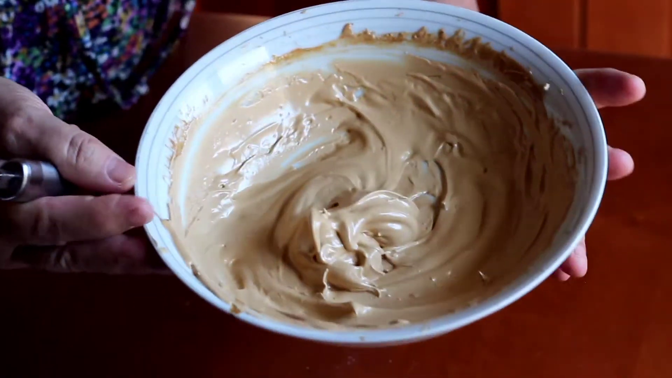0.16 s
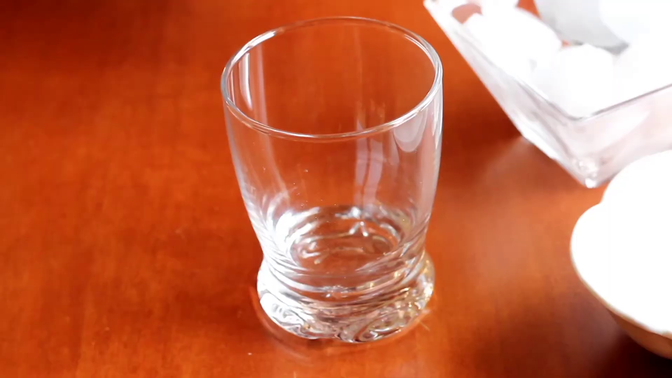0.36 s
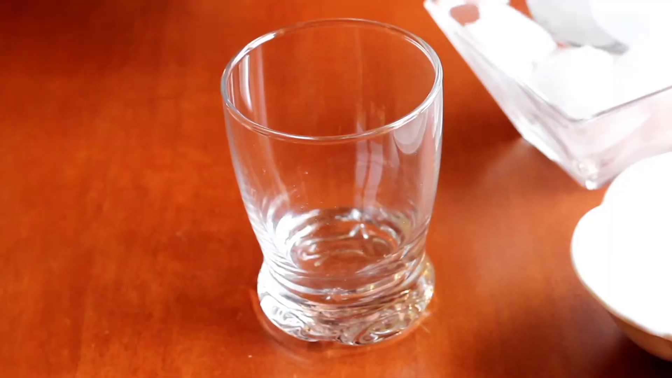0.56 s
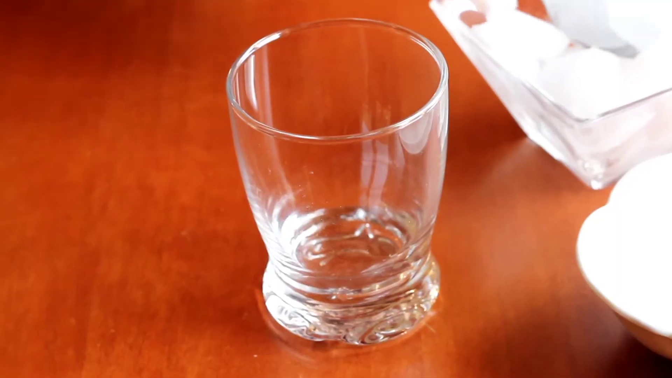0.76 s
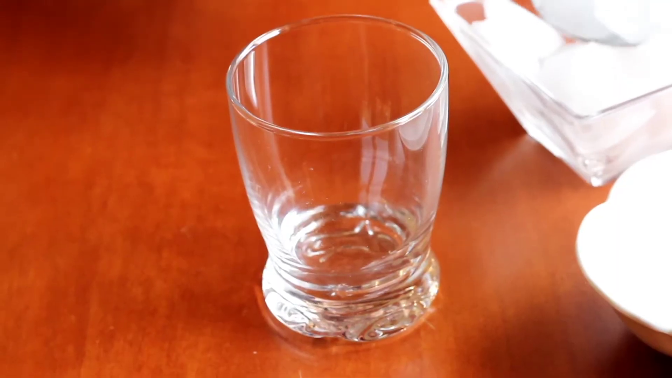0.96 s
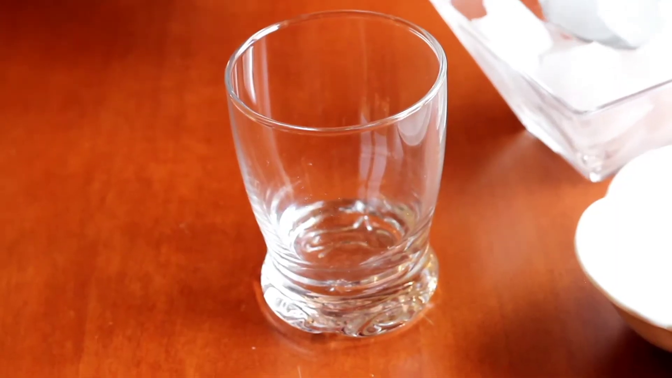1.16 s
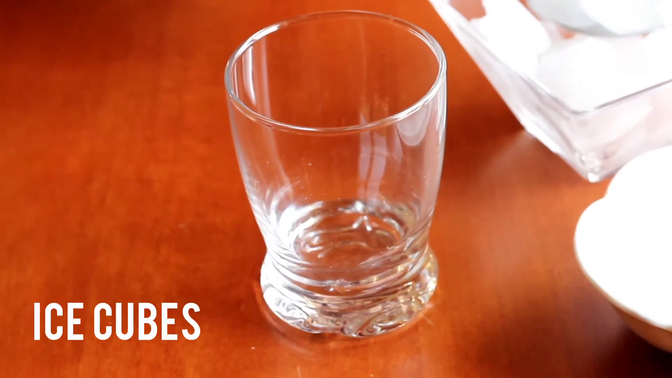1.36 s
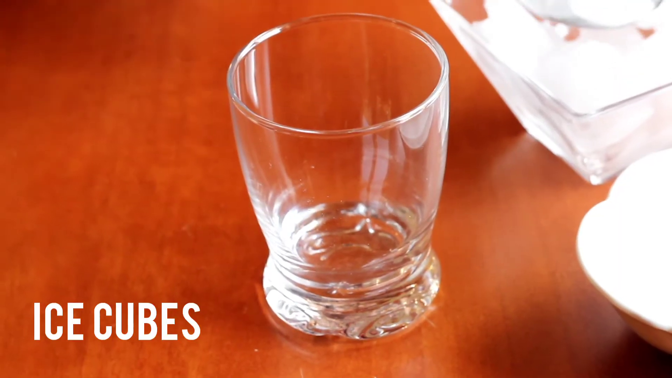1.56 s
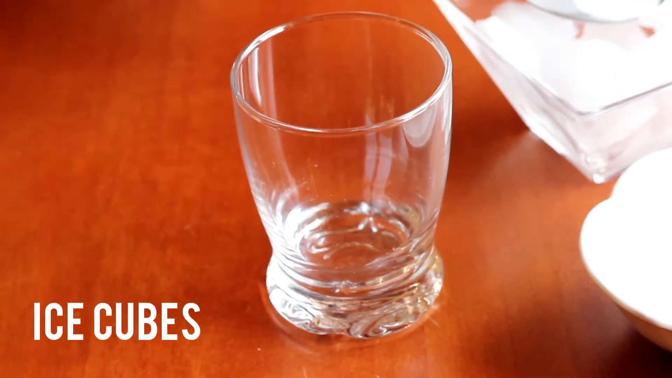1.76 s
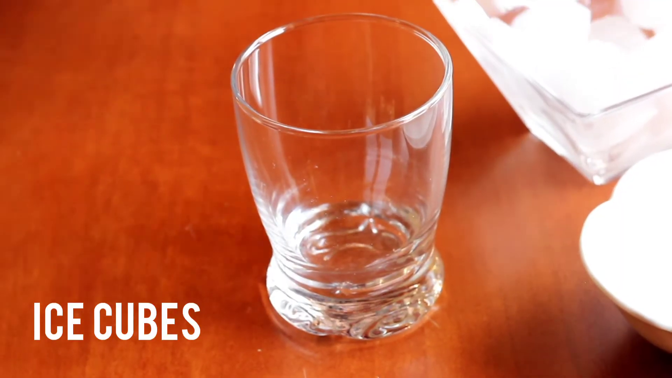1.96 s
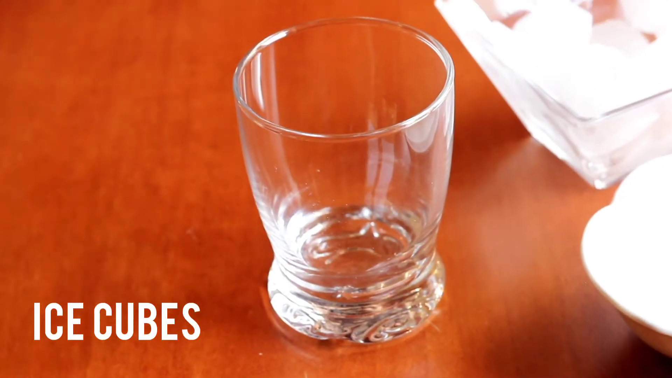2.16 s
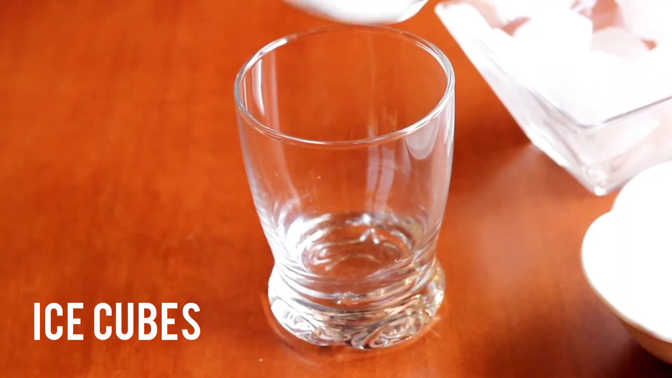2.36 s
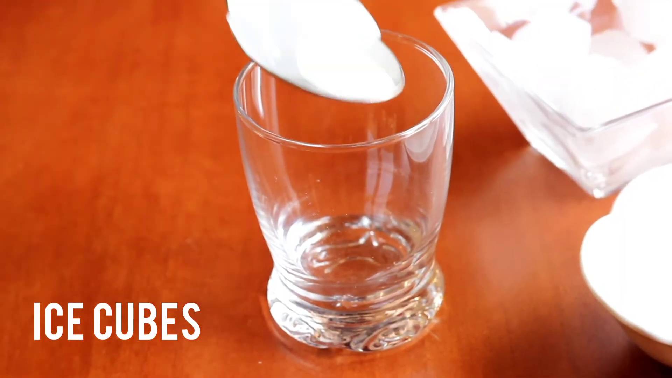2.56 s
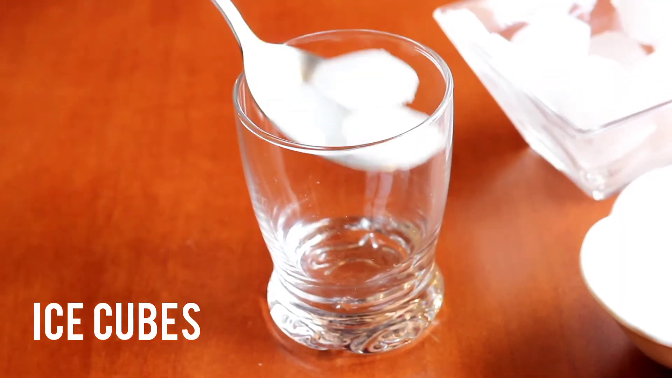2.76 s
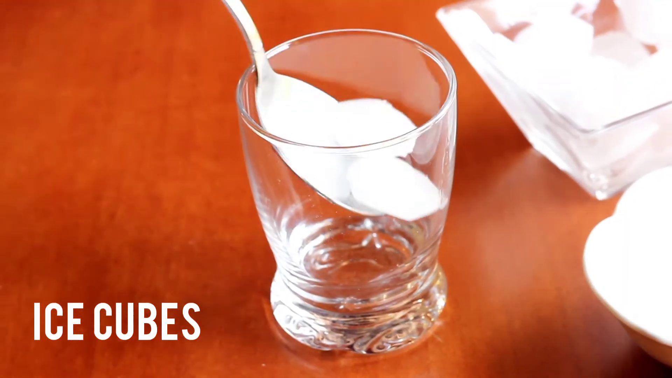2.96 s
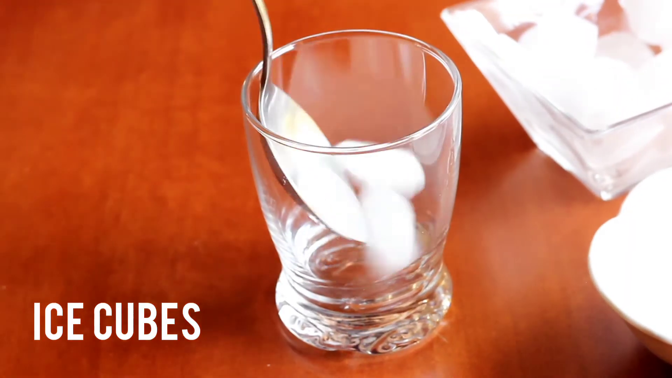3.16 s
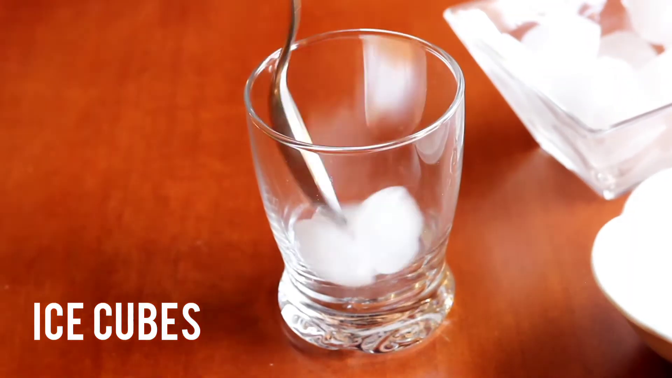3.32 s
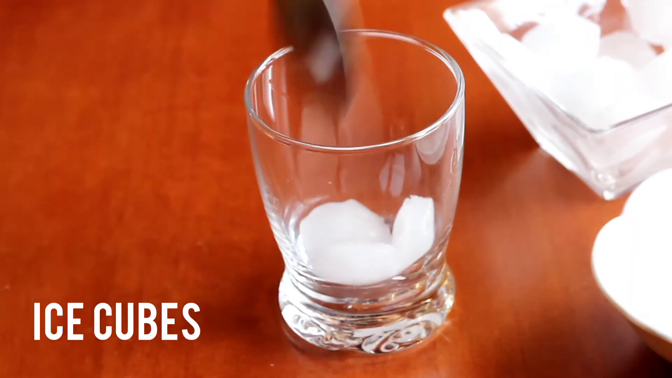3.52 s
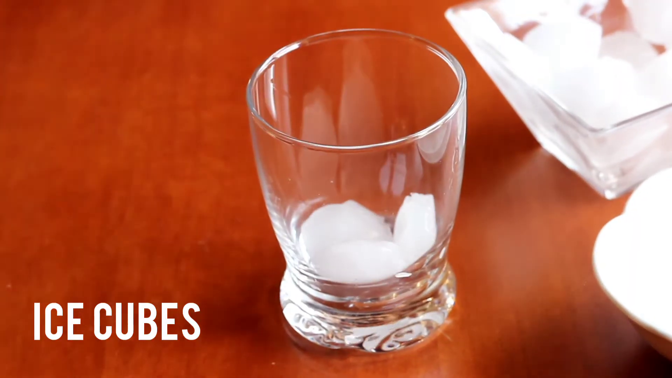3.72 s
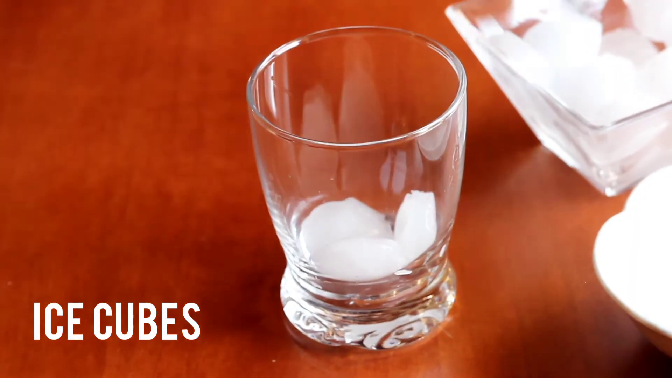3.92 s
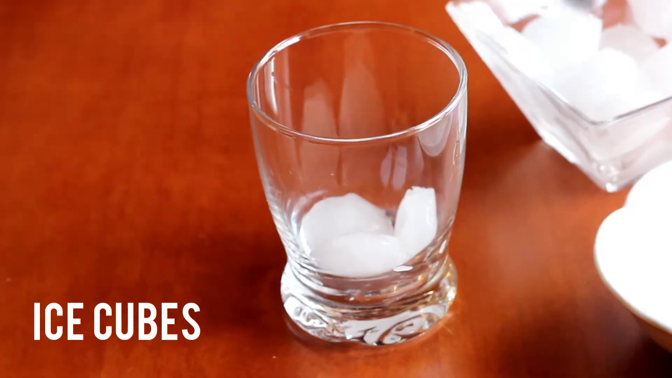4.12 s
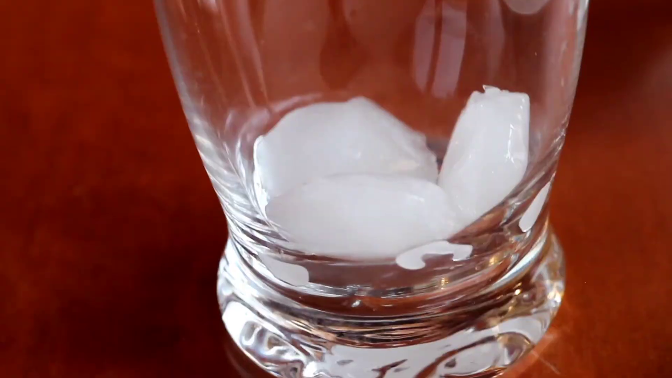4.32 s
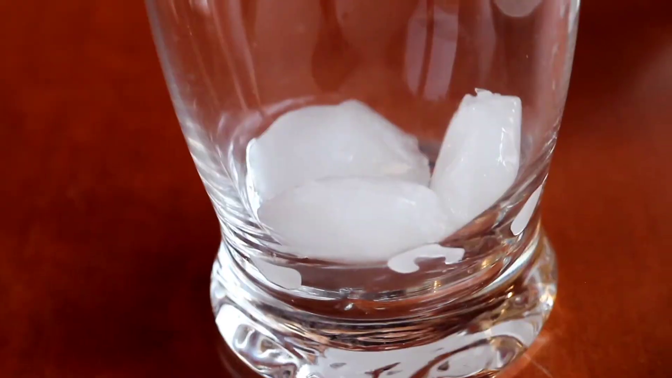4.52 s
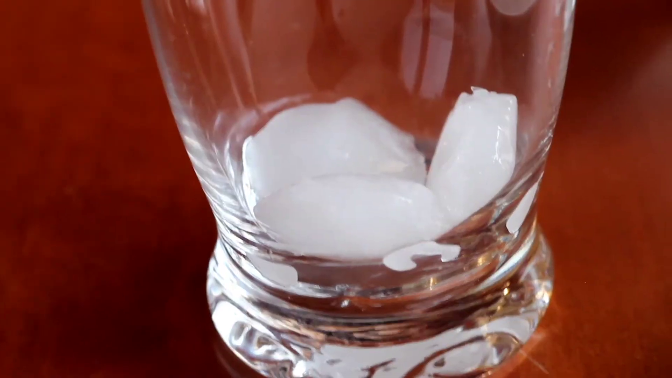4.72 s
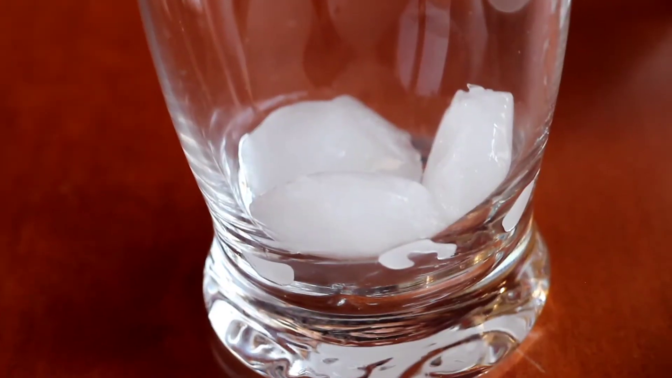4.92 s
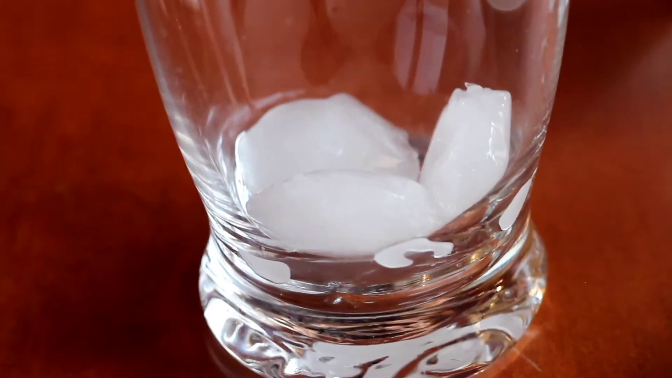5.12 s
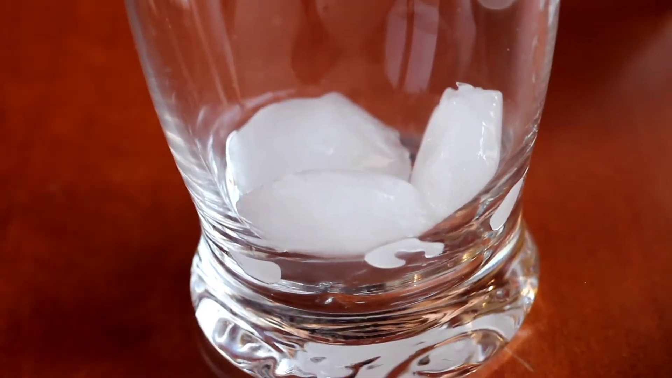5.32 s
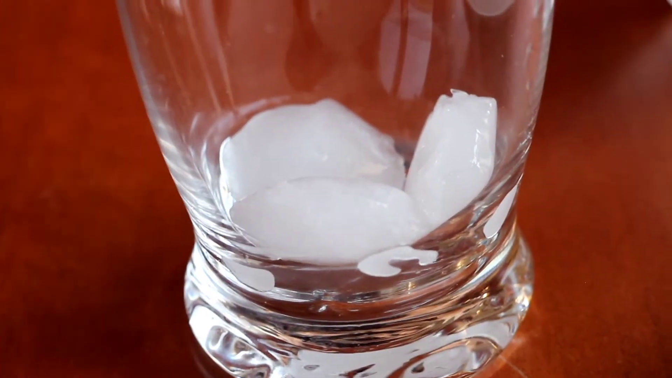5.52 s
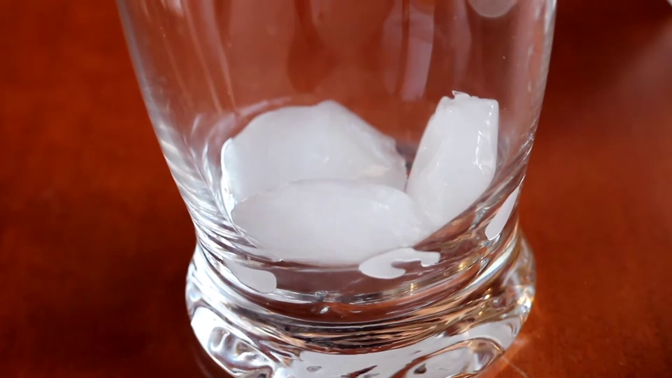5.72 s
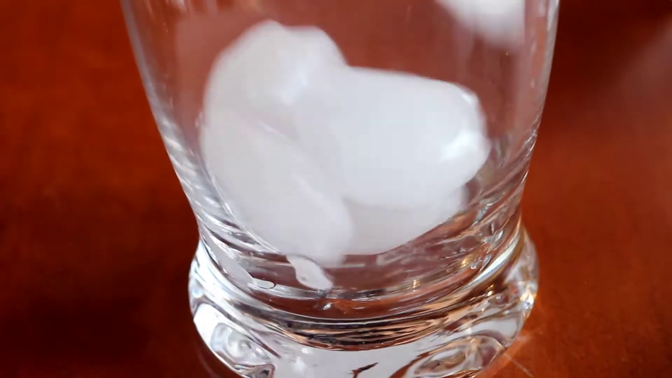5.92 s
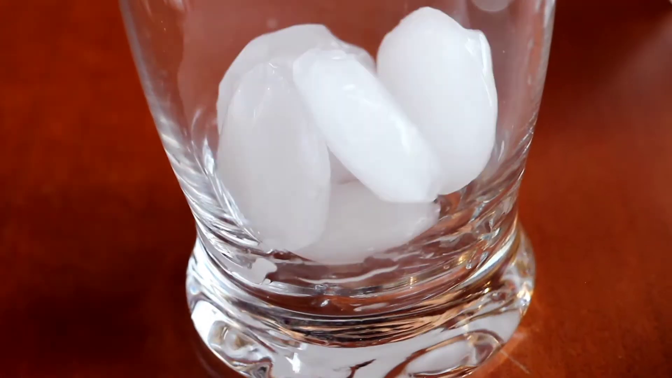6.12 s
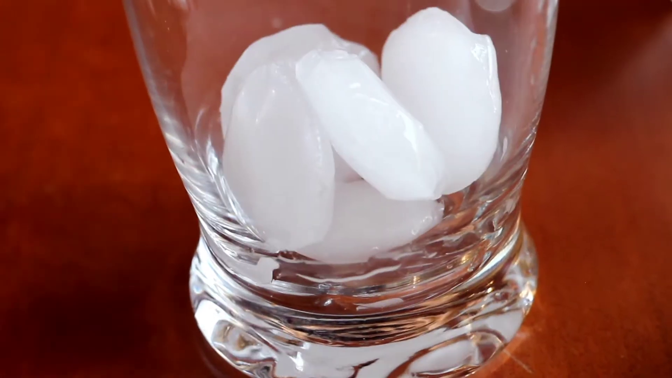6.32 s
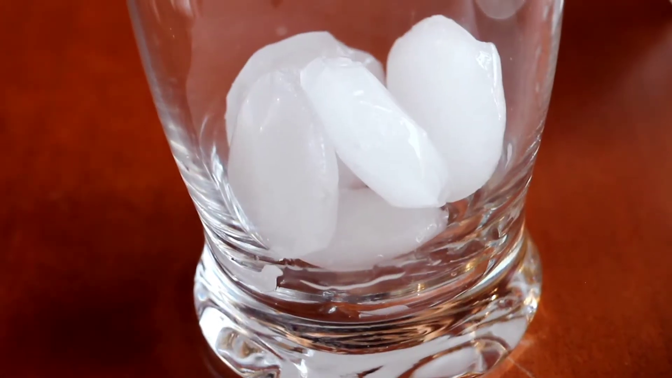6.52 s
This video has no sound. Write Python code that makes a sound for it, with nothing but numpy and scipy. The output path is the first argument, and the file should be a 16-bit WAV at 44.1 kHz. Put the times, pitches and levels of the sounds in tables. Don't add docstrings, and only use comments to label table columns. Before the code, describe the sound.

Irregular knocks of ice in a dish come first, dry and sharp with dull table thuds. A steel spoon ticks against a glass rim, then wet cubes slide off and clatter into the tumbler, ringing high and clear. One stray knock follows in the lull. A second, stronger cascade of ice hits glass and ice, then settles quickly. The close microphone catches short room echoes, soft hiss and a low hum from the jolted wooden table.

```python
import sys
import numpy as np
from scipy import signal
from scipy.fft import rfft, irfft
from scipy.io import wavfile
from scipy.ndimage import uniform_filter1d

SR = 44100
rng = np.random.default_rng(int(sys.argv[2]) if len(sys.argv) > 2 else 0)


def transcribe(u):
    v = np.clip(np.atleast_2d(u).T, -1, 1)
    q = np.round(v * 32767).astype(np.int16)
    wavfile.write(sys.argv[1], SR, q)


def linear_from_db(decibels):
    return 10 ** (np.asarray(decibels, float) / 20)


N = 290178


def at_hz(points, hz, column=1):
    points = np.array(points)
    return np.interp(np.log(hz), np.log(points[:, 0]), points[:, column])


def coloured(x, spectrum, low_hz, high_hz):
    hz = np.arange(N // 2 + 1) * SR / N + 1
    shaped = rfft(x) * linear_from_db(at_hz(spectrum, hz))
    in_band = shaped[(hz > low_hz) & (hz < high_hz)]
    return irfft(shaped, N) * N / np.sqrt(2 * np.sum(abs(in_band) ** 2))


def band_pass(x, band_hz):
    return signal.sosfilt(signal.butter(2, band_hz, "band", fs=SR, output="sos"), x)


def high_pass(x, order, floor_hz):
    return signal.sosfilt(signal.butter(order, floor_hz, "high", fs=SR, output="sos"), x)


def ring(clicks, hz, t60):
    r, w = linear_from_db(-60 / (t60 * SR)), 2 * np.pi * hz / SR
    return signal.lfilter([0, np.sin(w)], [1, -2 * r * np.cos(w), r * r], clicks + 1e-18)


# (f/Hz, level/dB per Hz)
HISS_SPECTRUM = [(20, -3), (55, -7), (150, -3), (400, -3), (800, -2.5), (2000, -8.5), (5000, -12.5),
                 (10000, -17.5), (14000, -16), (15900, -17.5), (16300, -53), (22000, -60)]


def mic_hiss():
    noise = rng.standard_normal(N)
    return linear_from_db(-64) * coloured(noise, HISS_SPECTRUM, low_hz=400, high_hz=16000)


# (f/Hz, width/Hz, level/dB)
TABLE_MODES = [
    [(56, 28, -7.5), (102, 7, -12.5), (144.8, 11, -2), (186, 20, -2)],
    [(260.9, 9, 1.5), (213, 16, -52)],
    [(377, 24, -1.5), (343, 21, -5), (594, 15, -7)],
]
# (rest level/dB, jolt level/dB, weight of the place, t60/s)
SHAKE = [
    (-67, -2.5, 0.4834, 3.56),
    (-75, -6, 0.96, 2.33),
    (-71, -9.5, -2.5, 1.9),
]
# (t/s, level/dB, place as level/dB gained by the low group, lost by the upper)
JOLTS = [(0.53, -75, -1), (1.48, -51.5, -2.5), (1.67, -64.5, 18.5), (2.4, -72, 3), (3.37, -58.5, -7),
         (3.54, -53.5, -3), (3.72, -72.5, 16.5), (4.25, -54.5, 0.5), (4.47, -61, -0.5), (5.0, -62.5, -3),
         (5.94, -59, 2), (6.05, -57, -4.5), (6.21, -62, 12), (6.55, -69, 13)]
JOLT_RISE_S = 0.11


def table_hum():
    out, t = np.zeros(N), np.arange(0, N, 50) / SR
    for group, (rest_db, jolt_db, weight, t60) in zip(TABLE_MODES, SHAKE):
        power = linear_from_db(rest_db) ** 2
        for s, db, place in JOLTS:
            rise = np.clip(1 + (t - s) / JOLT_RISE_S, 0, 1)
            fall_db = 60 * np.maximum(t - s, 0) / t60
            power = power + (rise * linear_from_db(db + jolt_db + weight * place - fall_db)) ** 2
        shake = np.interp(np.arange(N) / SR, t, np.sqrt(power))
        for hz, width, db in group:
            hum = ring(rng.standard_normal(N), hz, np.log(1000) / np.pi / width)
            out += linear_from_db(db - 3.5) * shake * hum / hum.std()
    return out


# (f/Hz, t60/s, level/dB)
KITCHEN_TAIL = [(151, 0.72, -21), (420, 0.61, -1), (930, 0.44, 0), (2500, 0.56, -2), (5000, 0.44, -2.5),
                (10030, 0.41, 2), (16100, 0.31, -27)]
# (t/s, level/dB)
ECHOES = [
    (.0015, -6),
    (.0078, -10.5),
    (0.0206, -20.5),
    (.027, -17.5),
]


def kitchen(x):
    t, answer = np.arange(SR) / SR, np.zeros(SR)
    edges = 70 * 2 ** np.arange(0, 8.1, 0.5)
    for low, high in zip(edges, edges[1:]):
        hz = np.sqrt(low * high)
        decay_db = at_hz(KITCHEN_TAIL, hz, column=2) - 60 * t / at_hz(KITCHEN_TAIL, hz)
        answer += band_pass(rng.standard_normal(SR), [low, high]) * linear_from_db(decay_db)
    answer *= linear_from_db(-29) * np.clip((t - 0.004) / 0.0024, 0, 1)
    for s, db in ECHOES:
        answer[round(s * SR)] += linear_from_db(db)
    return signal.fftconvolve(x, answer)[:N]


# (t/s, level/dB)
SLIDES = [
    [(0.38, -73), (0.57, -76), (0.718, -68), (0.97, -77.5), (1.072, -80), (1.668, -72), (1.752, -64.5),
     (1.914, -73.5), (2.05, -94)],
    [(3.1, -70), (3.222, -74), (3.336, -62), (3.364, -59), (3.522, -65.5), (3.62, -81)],
    [(5.68, -76), (5.788, -62), (5.908, -67), (5.982, -60), (6.13, -56.5), (6.186, -85), (6.3, -77)],
]
# (f/Hz, level/dB per Hz)
SLIDE_COLOUR = [(120, -28), (200, 8), (259, -10), (292, -18), (346, -5), (540, -5.5), (4220, -20),
                (12000, -46), (15600, -75), (22000, -120)]
GRAINS_PER_S, GRAIN_SPREAD_DB = 1200, 5


def level(rows):
    s, db = np.transpose(rows)
    return linear_from_db(np.interp(np.arange(N) / SR, s, db, left=-200, right=-200))


def ice_slides():
    struck = rng.random(N) < GRAINS_PER_S / SR
    strength = linear_from_db(GRAIN_SPREAD_DB * np.minimum(rng.exponential(1, N), 4))
    grains = struck * strength * rng.choice([-1, 1], N)
    fader = sum(level(rows) for rows in SLIDES)
    return linear_from_db(-6) * fader * coloured(grains, SLIDE_COLOUR, low_hz=1300, high_hz=2000)


CONTACT_S, FILM_S = 0.0002, 0.0009


def knocks(rows, hollow, floor_hz, click_db, second_db, click_t60, tick_db, tick_hz, thud_db):
    out, push, t = np.zeros(N + 2000), np.zeros(N), np.arange(2000) / SR
    noise = rng.standard_normal((len(rows), len(t)))
    ticks = band_pass(noise * np.exp(-t / 0.00066), tick_hz)
    for (s, peak_db, hz, second_hz, sharp_db, low_db), tick in zip(rows, ticks):
        cube = np.sin(2 * np.pi * hz * t) - linear_from_db(second_db) * np.sin(2 * np.pi * second_hz * t)
        cube *= linear_from_db(peak_db + click_db - 60 * t / click_t60) * (1 - np.exp(-t / CONTACT_S))
        at, sign = round((s + FILM_S) * SR), np.sign(tick[3])
        out[at:at + len(t)] += sign * cube + linear_from_db(sharp_db + tick_db) * tick / abs(tick).max()
        push[at] = sign * linear_from_db(low_db + thud_db)
    thud = sum(linear_from_db(db) * ring(push, hz, t60) for hz, db, t60 in hollow)
    return out[:N], high_pass(thud, 3, floor_hz)


ICE_REACH_DB, ICE_SCATTER_DB = 13.5, 4.5


def ice_ring(rows, modes, gain_db):
    s, db, click_hz = np.transpose([row[:3] for row in rows])
    at = ((s + FILM_S) * SR).astype(int)
    chance, out = rng.standard_normal((len(rows), len(modes), 2)), np.zeros(N)
    for k, (hz, own_db, t60) in enumerate(modes):
        reach_db = -ICE_REACH_DB * abs(np.log2(hz / click_hz))
        hit_db = db + own_db + gain_db + reach_db + ICE_SCATTER_DB * chance[:, k, 0]
        clicks = np.zeros(N)
        clicks[at] = np.sign(chance[:, k, 1]) * linear_from_db(hit_db)
        out += ring(clicks, hz, t60)
    return signal.lfilter([0.3], [1, -0.7], out)


DAMPING_DB_PER_S = 800


def struck_modes(blows, modes, gain_db, wobble_db, kick):
    t, blows = np.arange(N) / SR, np.array(blows)
    last = np.searchsorted(blows[:, 0], t, side="right") - 1
    since, phase = abs(t - blows[last, 0]), 2 * np.pi * rng.random((len(modes), 2))
    out, knots = np.zeros(N), np.arange(0, N / SR + 0.1, 0.009)
    for k, (hz, partner_hz, partner_db, t60, share_db) in enumerate(modes):
        db = np.where(last >= 0, blows[last, k + 1] - 60 * since / t60, -200)
        db = np.maximum.accumulate(db + DAMPING_DB_PER_S * t) - DAMPING_DB_PER_S * t
        db += wobble_db * np.interp(t, knots, rng.standard_normal(len(knots)))
        kicks = np.cumsum(kick * rng.standard_normal(len(blows)))
        turn = uniform_filter1d(kicks[last], size=60)
        main = np.sin(2 * np.pi * hz * t + phase[k, 0] + turn)
        partner = np.sin(2 * np.pi * partner_hz * t + phase[k, 1] - turn)
        out += uniform_filter1d(linear_from_db(db), size=24) * linear_from_db(share_db) * (main + linear_from_db(partner_db) * partner)
    return linear_from_db(gain_db) * out


def placed_blows(blows, shape, scatter_db):
    s, db, place = np.transpose(blows)[:, :, None]
    own_db, weight = np.transpose(shape)
    chance_db = scatter_db * rng.standard_normal((len(blows), len(shape)))
    return np.hstack([s, db + own_db + weight * place + chance_db])


# (t/s, click peak level/dB, click f/Hz, thud level/dB)
DISH_KNOCKS = [(0.399, -37, 3930, -83), (0.4464, -42, 3700, -60), (0.513, -38.5, 2560, -81),
               (0.5671, -32.5, 2900, -69), (0.5749, -46, 2500, -47.5), (0.593, -28.5, 2350, -42.5),
               (0.639, -63, 2520, -51), (0.792, -44, 2440, -50.5), (0.8825, -44.5, 2550, -51),
               (0.9857, -23.5, 2760, -39), (0.9974, -54, 2870, -39.5), (1.0143, -27.5, 3860, -53),
               (1.0329, -29, 1810, -62), (1.262, -37, 2440, -58), (1.2779, -23.5, 3980, -40),
               (1.298, -39, 3930, -58), (1.4163, -27.5, 4020, -77), (1.4419, -33, 2650, -46),
               (1.4593, -29, 3700, -39), (1.4788, -28, 2950, -48), (1.513, -26.5, 3140, -40),
               (1.5342, -20.5, 4300, -38), (1.556, -32, 2540, -42.5), (1.5976, -45, 3180, -50),
               (1.752, -42, 3480, -48), (1.774, -39.5, 2580, -57), (1.7888, -34.5, 2580, -45),
               (1.816, -43, 3300, -64), (1.8253, -37.5, 1580, -51), (3.9605, -30.5, 2150, -43)]
# (f/Hz, level/dB, t60/s)
DISH_THUD = [(147, -30, 0.15), (418, -7, 0.041), (600, 1, 0.0065), (930, 3, 0.0071), (1574, 5.5, 0.0054)]
# (f/Hz, level/dB, t60/s)
DISH_ICE = [(1560, -4.5, 0.063), (1774, -4, 0.051), (2584, -2, 0.024), (2764, -4, 0.016), (3224, -5, 0.016),
            (3700, -0.5, 0.024), (4000, -3, 0.019), (5940, 0, .025)]
# (t/s, ring level/dB, place as level/dB gained by the lowest pair)
TAPS = [(0.5657, -57.5, 16), (0.9837, -56, 6), (1.2758, -44, 1), (1.416, -57, 4), (1.531, -48.5, 15)]
# (f/Hz, partner f/Hz, partner level/dB, t60/s, share radiated level/dB)
DISH_MODES = [(2710, 2530, 1, .03, -9), (3960, 4050, -5, .14, 0), (4900, 5200, -6, .12, -1),
              (5865, 6130, -1, .015, -6), (8700, 7900, -3, .03, -2)]
# (level/dB, weight of the place)
TAP_SHAPE = [(0, 1), (3, -.7), (-1, -.4), (-9, .3), (-5, 0)]
TOUCH_S = 0.004
DISH_TICK_DB, STEEL_TICK_DB = -29.5, 6.5


def dish_digging():
    rows = []
    for s, db, hz, low_db in DISH_KNOCKS:
        steel = any(abs(s - tap[0]) < TOUCH_S for tap in TAPS)
        tick_db = db + DISH_TICK_DB + STEEL_TICK_DB * steel
        rows.append((s, db, hz, 3410 + 0.63 * hz, tick_db, low_db))
    click, thud = knocks(rows, DISH_THUD, floor_hz=133, click_db=1, second_db=-9, click_t60=0.0031,
                         tick_db=11.5, tick_hz=[4500, 9500], thud_db=2.5)
    taps = placed_blows(TAPS, TAP_SHAPE, scatter_db=5.5)
    dish = struck_modes(taps, DISH_MODES, gain_db=-9.5, wobble_db=7.5, kick=2.4)
    return click + ice_ring(rows, DISH_ICE, gain_db=-10) + dish, thud


# (f/Hz, level/dB)
SPOON_MODES = [(2380, -2.5), (3760, -3.5), (4235, 1), (5140, -0.5), (5350, -10), (5960, -5.5), (6470, 2.5),
               (6530, -5), (6820, -1.5), (7180, -8), (9580, 0), (3300, -12), (10570, -10), (13700, 2)]
# (f/Hz, level/dB, t60/s)
LOAD_THUMP = [(836, -22, 0.024), (424, -34, 0.027)]
SPOON_S, SPOON_DB, SPOON_T60_S = 2.7032, -32, 0.026
LOAD_S, REBOUND_DB = 2.7108, -16
THUD_FLOOR_HZ = 250


def spoon():
    click, thump = np.zeros(N), np.zeros(N)
    click[round(SPOON_S * SR)] = linear_from_db(SPOON_DB)
    click[round(LOAD_S * SR)] = linear_from_db(SPOON_DB + REBOUND_DB)
    thump[round(LOAD_S * SR)] = 1
    steel = sum((-1) ** k * linear_from_db(db) * ring(click, hz, SPOON_T60_S) for k, (hz, db) in enumerate(SPOON_MODES))
    load = sum(linear_from_db(db) * ring(thump, hz, t60) for hz, db, t60 in LOAD_THUMP)
    return high_pass(steel + load, 4, THUD_FLOOR_HZ)


# (t/s, ring level/dB, place as level/dB gained by the middle pairs)
RIM_BLOWS = [(2.7035, -49.5, 8), (3.1408, -73.5, 17.5), (3.1865, -77, 14), (3.2095, -62, 33),
             (3.2162, -56, 16), (3.25, -61, 15), (3.289, -59, 13), (3.3148, -46, 6), (3.3295, -48, -8),
             (3.36, -53, -8), (3.413, -65, 5), (3.445, -66, 7), (5.733, -55, -5), (5.7565, -46, 0.5),
             (5.7728, -57, 15), (5.795, -64, 10), (5.855, -65, 6), (5.873, -62, 2.1), (5.948, -66, 10),
             (5.9612, -52, 13.5), (6.028, -70, 20), (6.072, -68, 14.5), (6.103, -76, -1)]
# (f/Hz, partner f/Hz, partner level/dB, t60/s, share radiated level/dB)
RIM_MODES = [(9410, 9455, -6, .2, -2), (11505, 11560, -5, .15, -2), (12310, 12400, -3, .15, -1),
             (13505, 13550, -4, .13, -5), (15290, 14550, -6, .12, -5)]
# (level/dB, weight of the place)
RIM_SHAPE = [(4, 0.17), (3, 0.81), (-1.5, 1.08), (4, -0.38), (5, 0.38)]


def rim_ring():
    blows = placed_blows(RIM_BLOWS, RIM_SHAPE, scatter_db=1)
    return struck_modes(blows, RIM_MODES, gain_db=0.5, wobble_db=3.5, kick=2.26)


# (t/s, ring level/dB of the first, second and
WALL_BLOWS = [(2.7035, -52.5, -54.5, -51), (2.78, -59, -67, -62), (3.118, -65, -83, -78),
              (3.1408, -54.5, -69, -69), (3.1865, -53, -59, -63), (3.2095, -44, -44, -47),
              (3.2165, -32.5, -38, -35), (3.228, -32, -40, -42), (3.241, -32, -42, -42),
              (3.255, -31.5, -40, -42), (3.268, -33, -47, -56), (3.289, -31, -48, -46),
              (3.302, -34, -54, -50), (3.3145, -36, -26.5, -37), (3.335, -40, -34, -37),
              (3.352, -53, -42, -42), (3.365, -46, -39, -53), (3.386, -43, -47, -49),
              (3.396, -58, -55, -41), (3.42, -48, -51, -52), (3.445, -51, -47, -58),
              (3.48, -43.5, -53, -51), (3.52, -59, -56, -60), (3.58, -60.5, -58.5, -71),
              (5.7332, -29.5, -29, -48), (5.746, -39, -30, -51), (5.758, -31, -28, -39),
              (5.773, -24, -25, -53), (5.79, -21, -27, -46), (5.808, -27, -24, -47),
              (5.82, -35, -28.5, -57), (5.834, -27, -27, -54), (5.867, -33, -34, -55),
              (5.88, -33, -39, -57), (5.893, -34, -38, -64), (5.92, -42, -45, -66), (5.948, -47, -44, -65),
              (5.961, -35, -37, -52), (5.978, -39, -42, -52), (5.99, -39, -43, -58), (6.005, -39, -44, -61),
              (6.025, -48, -50, -64), (6.059, -41, -49, -59), (6.075, -41.5, -52, -67),
              (6.103, -47, -57, -69), (6.13, -56, -62, -71), (6.15, -63, -66, -75), (6.17, -55, -65, -75),
              (6.2, -63.5, -72, -79)]
# (f/Hz, partner f/Hz, partner level/dB, t60/s, share radiated level/dB)
TUMBLER_MODES = [
    (2250, 2271, -19, .8, -1),
    (3492, 3528, -22, .85, -1),
    (6058, 6025, -9, .35, -3),
    (1070, 1040, -3, .18, -6),
]


def wall_ring():
    return struck_modes(WALL_BLOWS, TUMBLER_MODES[:-1], gain_db=2, wobble_db=0.9, kick=0.71)


# (t/s, click peak level/dB, click f/Hz, sharp tick level/dB, thud level/dB)
FIRST_LOAD = [(2.7046, -24.5, 4370, -34.5, -31), (2.71, -31, 4160, -51, -39), (2.7289, -44, 5170, -48, -35),
              (3.169, -35, 4130, -50, -47), (3.1867, -26, 3730, -55, -24.5), (3.2101, -23, 5150, -38, -59),
              (3.2166, -16.5, 5480, -38, -52), (3.2268, -22, 5160, -47, -30.5),
              (3.2363, -23, 4940, -49, -40), (3.2409, -21, 5100, -33, -33.5), (3.2665, -20, 3840, -39, -37),
              (3.2537, -28, 4700, -48, -52), (3.2887, -18.5, 4680, -47, -31.5),
              (3.299, -32, 4200, -46, -45), (3.3134, -17, 3450, -46, -30), (3.3288, -25, 3880, -31.5, -34),
              (3.355, -32, 4700, -39, -46), (3.3743, -37, 4500, -44, -50), (3.3961, -21.5, 3300, -46, -46),
              (3.4132, -30, 5000, -42, -44), (3.4304, -32.5, 4330, -48, -41.5),
              (3.4449, -22.5, 5400, -42, -44.5)]
SECOND_LOAD = [(5.695, -42, 9300, -70, -70), (5.708, -41, 9900, -69, -70), (5.7154, -35, 9600, -49, -69),
               (5.7331, -25.5, 3700, -43, -38.5), (5.758, -19.5, 3550, -37, -39.5),
               (5.7723, -20, 4470, -38, -17.5), (5.7898, -20.5, 5000, -61, -27.5),
               (5.8343, -21, 4800, -52, -52), (5.8446, -25, 5000, -51, -40), (5.8671, -22, 4280, -48, -42),
               (5.8726, -37, 4530, -57, -37), (5.8925, -43, 4550, -50, -33.5),
               (5.9476, -26, 3100, -50, -38), (5.9614, -16.5, 5240, -37.5, -27),
               (5.9631, -16, 3160, -46, -45), (5.968, -19, 4950, -36, -34), (6.0264, -51, 4050, -63, -37),
               (6.0589, -29, 3060, -67, -35), (6.063, -26.5, 4670, -49, -54), (6.0697, -34, 5260, -45, -44),
               (6.0738, -31.5, 4160, -53, -35.5), (6.103, -29, 3630, -61, -44)]
# (f/Hz, level/dB, t60/s)
TUMBLER_THUD = [(320, -7.5, 0.013), (450, -21, 0.075), (548, -10.5, 0.019), (809, 1.5, 0.01),
                (1012, -1.5, 0.012), (1470, -24, 0.013)]
# (f/Hz, level/dB, t60/s)
GLASS_ICE = [(2840, -5.5, 0.033), (3005, -1, 0.037), (3300, -1.5, 0.021), (4130, -2.5, 0.024),
             (4500, -4, 0.027), (4780, -4.5, 0.023), (5060, 0.5, 0.02), (5305, -7.5, 0.022),
             (5700, -5.5, .025)]
AIR_DB = -8


def tumbler_ice():
    rows = [(s, db, hz, 500 + 0.565 * hz, tick_db, low_db)
            for s, db, hz, tick_db, low_db in FIRST_LOAD + SECOND_LOAD]
    click, thud = knocks(rows, TUMBLER_THUD, floor_hz=THUD_FLOOR_HZ, click_db=-5.5, second_db=-3,
                         click_t60=0.0077, tick_db=9.5, tick_hz=[4500, 11000], thud_db=-0.5)
    landings = [(row[0], row[-1] + AIR_DB) for row in FIRST_LOAD[3:] + SECOND_LOAD]
    air = struck_modes(landings, TUMBLER_MODES[-1:], gain_db=4.5, wobble_db=2, kick=1.498)
    return click + ice_ring(rows, GLASS_ICE, gain_db=-7.5), thud, air


def scene():
    rub, steel, rim = ice_slides(), spoon(), rim_ring()
    dish_click, dish_thud = dish_digging()
    click, thud, air = tumbler_ice()
    wall = wall_ring() + air
    direct = dish_click + linear_from_db(-20) * dish_thud + click + linear_from_db(-3.5) * thud
    direct = direct + linear_from_db(4) * steel + rub + wall + rim
    sent = linear_from_db(-2) * dish_click + dish_thud + linear_from_db(-3) * click + thud
    sent = sent + steel + rub + linear_from_db(-13) * rim + linear_from_db(-15) * wall
    return (direct + kitchen(sent) + table_hum())[None]


def roll_off(x):
    return signal.sosfilt(signal.butter(12, 16510, fs=SR, output="sos"), x)


def record(dry):
    heard = signal.sosfilt(signal.butter(6, 15200, fs=SR, output="sos"), dry)
    heard = high_pass(heard + mic_hiss(), 2, 36)
    return roll_off(heard)


dry = scene()
out = record(dry)
transcribe(out)
```